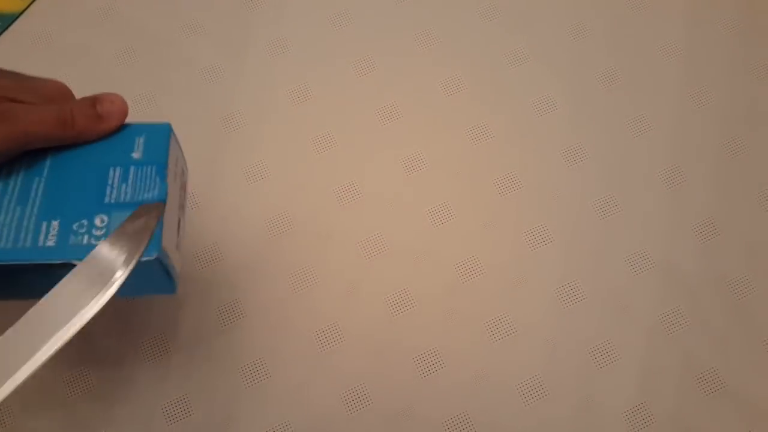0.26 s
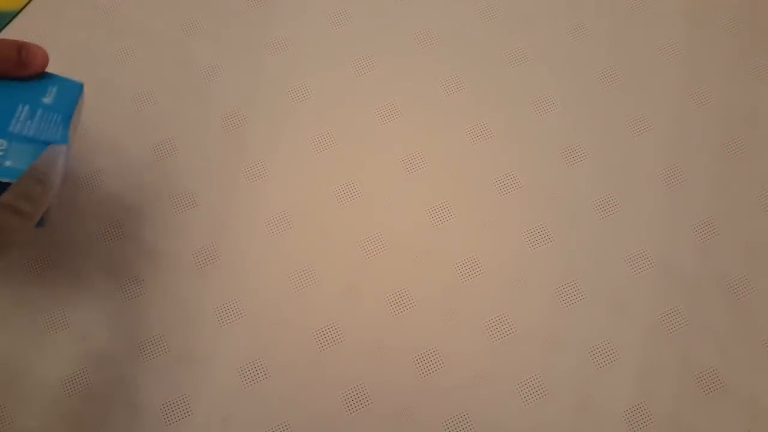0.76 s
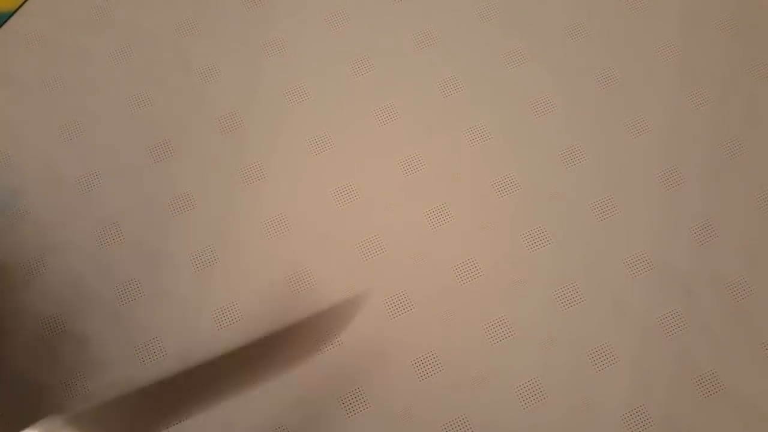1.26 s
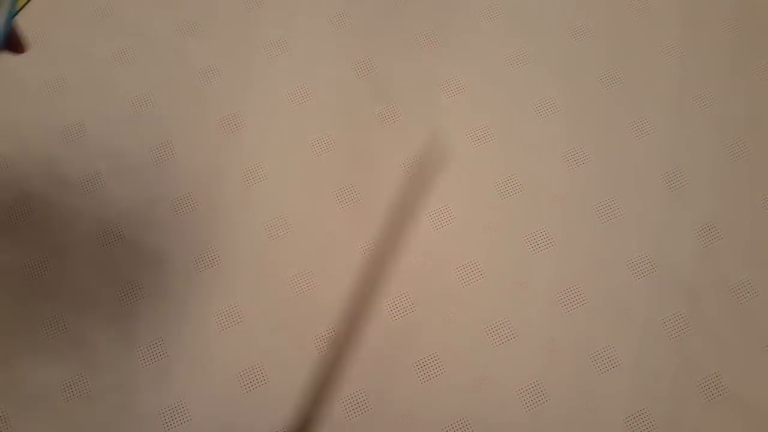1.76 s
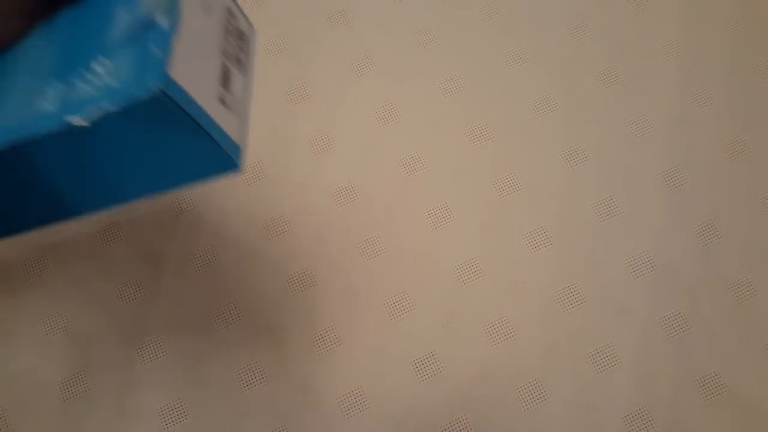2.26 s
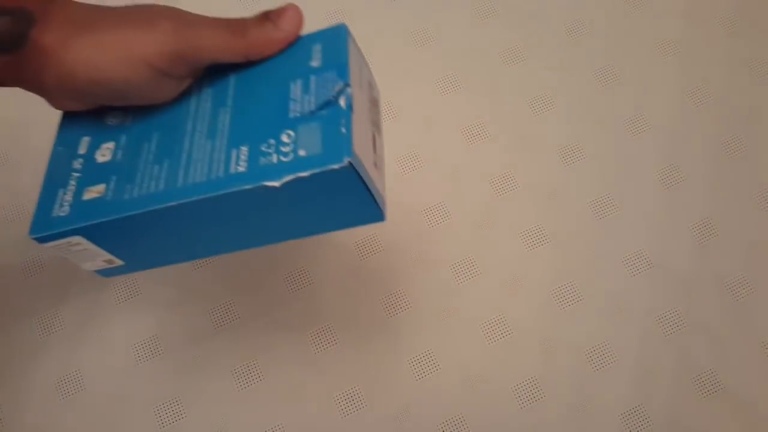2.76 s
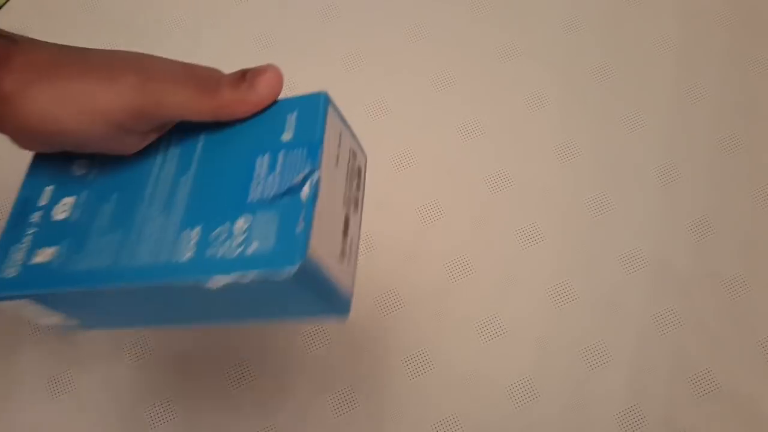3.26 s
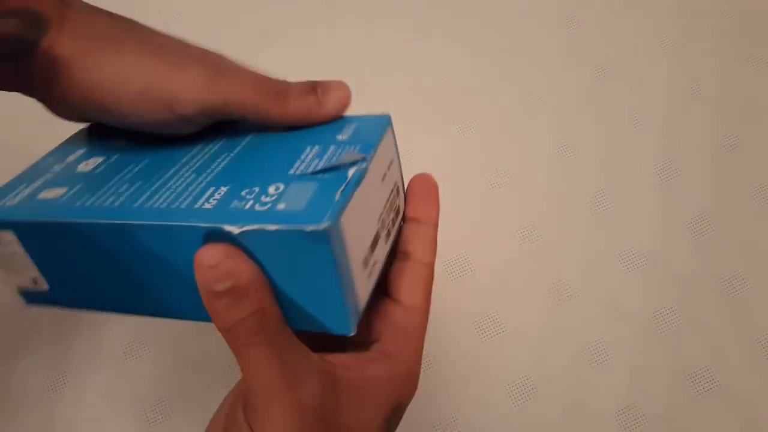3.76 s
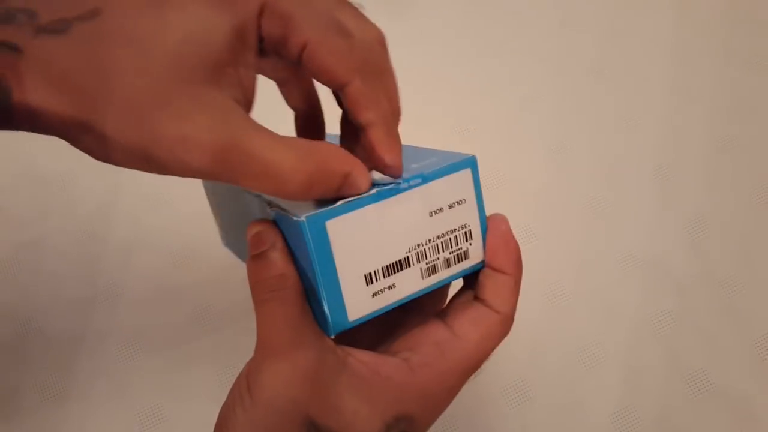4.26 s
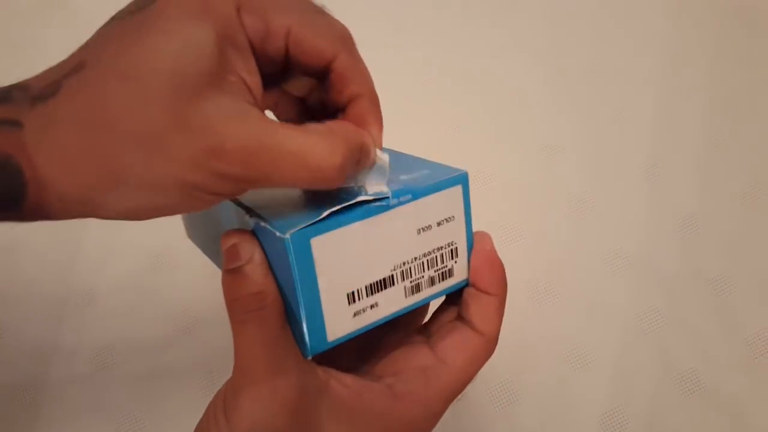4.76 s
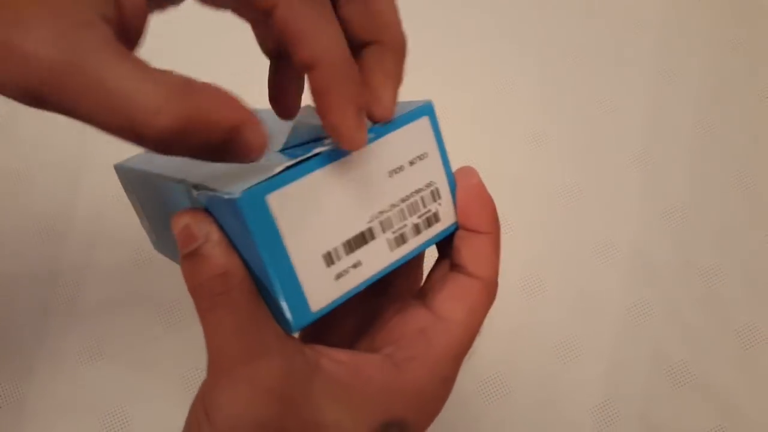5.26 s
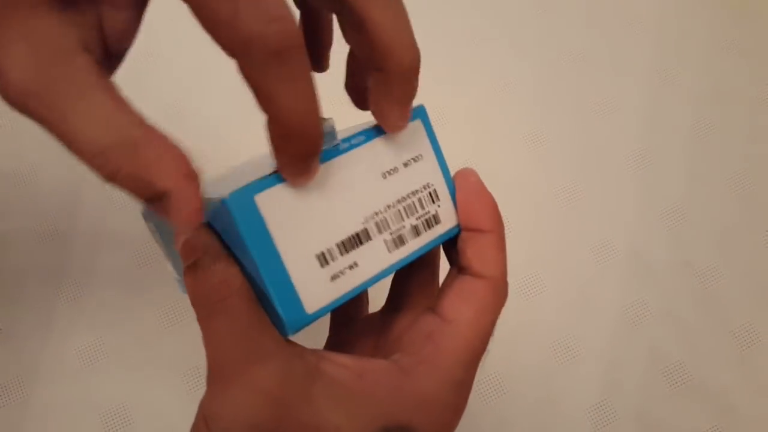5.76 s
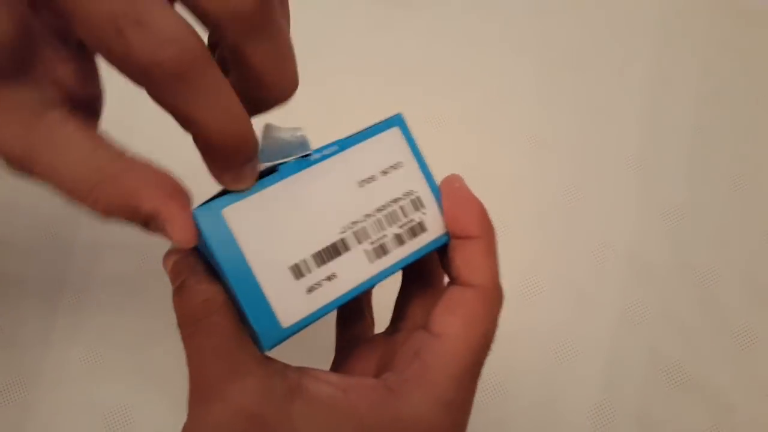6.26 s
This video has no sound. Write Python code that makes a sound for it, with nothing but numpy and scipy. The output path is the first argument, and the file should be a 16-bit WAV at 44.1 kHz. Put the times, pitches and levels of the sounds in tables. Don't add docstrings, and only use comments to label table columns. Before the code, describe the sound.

A blade ticks and scrapes on a small cardboard box, the seal pops loudly, the knife clunks onto a table, then fingers rub and peel snapping plastic film.

```python
import sys
import numpy as np
from scipy import signal
from scipy.io import wavfile
from scipy.ndimage import uniform_filter1d

SR = 44100
rng = np.random.default_rng(int(sys.argv[2]) if len(sys.argv) > 2 else 0)


def wav_record(signal):
    frames = np.transpose(np.atleast_2d(signal))
    bounded = np.clip(frames, -1, 1)
    quanta = np.round(bounded * 32767).astype(np.int16)
    wavfile.write(sys.argv[1], SR, quanta)


def linear_from_db(decibels):
    return 10 ** (np.asarray(decibels, float) / 20)


N = 286650


def evened(x):
    return x / np.sqrt(np.mean(x ** 2) + 1e-20)


def read(points, hz):
    f, value = np.transpose(points)
    return np.interp(np.log(hz + 1), np.log(f + 1), value)


def add(mix, s, sound):
    part = mix[:, round(s * SR):][:, :sound.shape[1]]
    part += sound[:, :part.shape[1]]


def filtered(x, order, hz, kind="low"):
    return signal.lfilter(*signal.butter(order, hz, kind, fs=SR), x)


def paired(size, same):
    a, b = rng.standard_normal((2, size))
    return np.array([a, same * a + np.sqrt(1 - same ** 2) * b])


def ring(x, modes, flip=-1):
    t = np.arange(3000) / SR
    body = np.zeros(3000)
    for k, (hz, width, db) in enumerate(modes):
        decay = np.sqrt(width) * np.exp(-np.pi * width * t)
        body += linear_from_db(db) * decay * np.sin(2 * np.pi * hz * t) * flip ** k
    return signal.oaconvolve(x, body[None] / np.linalg.norm(body), axes=1)[:, :N]


def burst(ms, same=0.63):
    t = np.arange(1500) / SR
    span = ms / 1000 + 1e-4
    uneven = linear_from_db(3 * rng.exponential(1, 1500))
    envelope = np.exp(-t / span) * (1 - np.exp(-t / (0.26 * span)))
    slips = paired(1500, same) * uneven * envelope
    return slips / np.sqrt(np.mean(np.sum(slips ** 2, 1)))


def push(ms):
    blow = signal.windows.hann(round(ms * SR / 1000) + 3)
    return np.array([blow, blow]) / np.linalg.norm(blow)


def pressure(rubs):
    t, out = np.arange(N) / SR, np.zeros(N)
    for s, rise, fall, db in rubs:
        span = slice(max(round((s - 2 * rise) * SR), 0), round((s + 2 * fall) * SR))
        away = abs(t[span] - s) / (np.where(t[span] < s, rise, fall) + 1e-4)
        out[span] += linear_from_db(db - 16 * away ** 1.2)
    return out


def contacts():
    # t/s, level/dB
    edge_ticks = [(0.0714, -44.5), (0.3936, -39.5), (0.5005, -39), (1.042, -42), (1.0848, -50),
                  (1.1003, -46.5), (1.1124, -48), (1.3567, -44), (1.8501, -58), (1.9918, -60),
                  (2.3135, -58), (2.9511, -56), (3.4475, -42.5), (3.7345, -35), (4.8059, -43),
                  (5.3866, -49.5)]
    # t/s, level/dB
    wall_taps = [(0.0262, -53), (0.0404, -57), (0.0602, -53), (0.2408, -55), (0.8025, -59.5), (0.824, -51),
                 (0.9027, -56), (0.9955, -54), (1.029, -52.5), (1.1552, -51), (3.1641, -54), (3.6136, -52),
                 (3.7544, -38.5), (3.761, -34), (4.08, -55), (4.148, -57.5), (4.8967, -53.5),
                 (5.3721, -62.5), (5.5785, -47), (5.618, -55), (6.1334, -60)]
    # t/s, level/dB
    film_ticks = [(0.2603, -66), (0.5244, -54), (0.7561, -58.5), (3.6605, -54), (3.6465, -65),
                  (3.7994, -55), (4.15, -57), (5.635, -63), (6.0684, -66), (3.9454, -62.5), (4.8214, -43.5),
                  (5.1514, -53.5), (5.7614, -60), (5.7886, -36.5), (5.868, -53.5), (5.8964, -62)]
    # t/s, panel level/dB, hollow level/dB, film level/dB, contact time/ms
    scuffs = [(3.5013, -54, -61, -64.5, 5.8), (3.5432, -54, -55.5, -61, 4.47),
              (3.8306, -53, -67.5, -55, 5.3), (5.2538, -40.5, -50.5, -39.5, 3.34),
              (5.5711, -56, -61, -53, 3.2), (5.706, -41, -55.5, -46.5, 3.79),
              (5.7828, -62.5, -65.5, -52.5, 3.13), (5.0776, -43, -41, -46, 2), (5.1006, -43, -50, -51, 1.4),
              (3.6475, -58, -55, -68, 1.5)]
    # (panel, hollow, film) level/dB
    on_edge, on_wall, on_film = (0, -13, -19), (0, -2, -13.5), (-10.5, -17, 0)
    events = list(scuffs)
    for rows, share in ((edge_ticks, on_edge), (wall_taps, on_wall), (film_ticks, on_film)):
        events += [(s, *np.add(db, share), 1.5) for s, db in rows]
    drive = np.zeros((3, 2, N))
    for s, panel_db, hollow_db, film_db, ms in events:
        contact = burst(ms, .95 if ms < .5 else .7) * max(ms / 1.582, 1)
        for part, db in zip(drive, (panel_db + 11.5, hollow_db + 17.0, film_db + 13)):
            add(part, s, linear_from_db(db) * contact)
    return drive


def rubbing():
    # peak t/s, rise/s, fall/s, peak level/dB
    card_rubs = [(.05, 0.26, 0.221, -61), (.312, .08, .06, -60.5), (.4, 0.0118, 0.033, -62.5),
                 (.518, 0.0925, .09, -64), (.74, 0.335, 0.098, -71.5), (.82, 0.038, 0.076, -64.5),
                 (.93, 0.096, 0.046, -61), (1.05, .07, 0.295, -64.5), (1.3, .05, .07, -58),
                 (1.378, .035, 0.06, -56), (4.825, .04, .045, -62), (4.728, .06, .035, -61),
                 (3.02, .012, .045, -67), (3.2, .06, .12, -67), (.13, .04, .07, -70),
                 (1.44, .03, .05, -66)]
    # peak t/s, rise/s, fall/s, peak level/dB
    skin_rubs = [(2.75, .14, 0.372, -69), (3.558, 0.151, 0.033, -63.5), (3.684, 0.084, 0.071, -58.5),
                 (3.745, 0.0235, 0.146, -54), (3.85, 0.094, 0.0325, -61), (3.92, 0.038, 0.179, -71),
                 (4.156, 0.094, 0.021, -68.5), (4.366, 0.27, 0.37, -72), (5.265, 0.0255, 0.04, -67),
                 (5.72, .005, 0.0327, -59), (6.122, 0.071, 0.021, -67.5)]
    # peak t/s, rise/s, fall/s, peak level/dB
    peel_rubs = [(1.375, 0.0432, .07, -62), (4.68, .05, .04, -61), (4.731, .045, .04, -47.5),
                 (4.81, .032, .05, -53), (4.84, .03, .035, -55), (5.081, .001, .022, -49),
                 (5.103, .002, .035, -57), (5.15, .04, .07, -68), (5.252, .045, .004, -60),
                 (5.38, .015, 0.021, -69), (5.786, 0.009, 0.011, -54), (5.87, 0.026, .1, -77.5)]
    # peak t/s, rise/s, fall/s, peak level/dB
    spine_rubs = [
        (3.091, 0.0041, 0.042, -42.5),
        (3.164, 0.0424, 0.187, -55.5),
    ]
    # (panel, hollow, film) level/dB
    by_card, by_skin, by_peel = (0, -2.5, -10), (-2.98, 0, -15), (-13, -18, 0)
    by_spine = (-13.5, 0, -33)
    loads = [pressure(rubs) for rubs in (card_rubs, skin_rubs, peel_rubs, spine_rubs)]
    load = linear_from_db(np.transpose([by_card, by_skin, by_peel, by_spine])) @ loads
    drive = np.zeros((3, 2, N))
    for k, (same, catch_db) in enumerate(((.7, 1.5), (.9, 1.2), (.7, 1.3))):
        clumps = linear_from_db(catch_db * evened(uniform_filter1d(rng.standard_normal(N), 200)))
        struck = rng.random(N) < 6000 / SR
        fibres = linear_from_db(3.0 * np.minimum(rng.exponential(1, N), 4)) * struck
        grain = evened(paired(N, same) * (fibres + 0.55) * clumps)
        drive[k] = grain * load[k] * linear_from_db(-2.0)
    return drive


def handling():
    # f/Hz, width/Hz, level/dB
    panel = [(1643, 390, -6), (2237, 310, -1.5), (2748.5, 380, -2.5), (3108, 410, -3.5), (4334, 1900, -8.5)]
    # f/Hz, width/Hz, level/dB
    hollow = [(335.2, 95, -1.5), (574.3, 160, -2), (802.6, 120, -2.5), (950, 180, -2.5), (1250, 300, -5.5)]
    # f/Hz, width/Hz, level/dB
    film = [(5227, 1200, -8), (7200, 800, -1.5), (9000, 1000, -1.5), (13250, 1300, -8), (14600, 2000, -11)]
    drive = contacts() + rubbing()
    direct = linear_from_db(-9) * filtered(drive[0], 1, [900, 6500], "band")
    return direct + sum(ring(part, modes) for part, modes in zip(drive, (panel, hollow, film)))


def pop():
    # t/s, push level/dB, push/ms, crack level/dB, crack/ms
    jerks = [
        (1.2257, -30, 0.43, -8.5, 0.64),
        (1.2268, -28, 0.129, -8.5, 1.07),
        (1.2287, -18, 0.905, -18, 1.94),
        (1.2355, -27.5, 0.56, -16, 4.5),
        (1.241, -30.5, 1, -18, 10.1),
    ]
    # f/Hz, width/Hz, level/dB
    popped_box = [(111, 54, -14.5), (160, 40, -13), (240, 28, -12.5), (327.1, 40, -10), (450.3, 83, -1),
                  (541, 72, -5), (692, 110, -8), (811, 60, -10), (1050, 150, -13.5), (1400, 390, -19),
                  (1950, 350, -7.5), (2248, 60, -6.5), (2690, 150, -4), (3100, 110, -2.5), (4600, 1800, -4)]
    blows, cracks = np.zeros((2, 2, N))
    for s, push_db, push_ms, crack_db, crack_ms in jerks:
        add(blows, s, linear_from_db(push_db + 12) * push(push_ms))
        add(cracks, s, linear_from_db(crack_db + 15.0) * burst(crack_ms, .6))
    thump = filtered(ring(blows, popped_box, flip=1), 2, 150, "high")
    rattle = ring(filtered(cracks, 1, 500, "high"), popped_box)
    body = filtered(cracks, 2, [650, 2300], "band")
    tear = filtered(cracks, 1, [2000, 13000], "band")
    return thump + 0.55 * rattle + body + tear


def knife():
    # t/s, thud level/dB, push/ms, edge tick level/dB
    landings = [
        (3.0069, -38.5, 0.6, -55),
        (3.014, -54, 1.02, -67),
        (3.029, -49.5, 1.25, -66),
        (3.072, -41, 1.24, -58.5),
        (3.0809, -26.5, 1.3, -31.5),
        (3.091, -31.5, 1.657, -65),
        (3.10, -35, 2.1, -64),
        (3.124, -47, 2.64, -64),
    ]
    # t/s, f/Hz, level/dB
    bending = [
        (3.12, 160.0, -46),
        (3.194, 162, -41.5),
        (3.212, 162.5, -58.5),
        (3.234, 161, -45),
        (3.248, 162, -88),
        (3.27, 163.9, -70.5),
    ]
    # f/Hz, width/Hz, level/dB
    table = [(53.37, 14.4, -6), (89, 101, -9.5), (160, 60.7, 5), (326.7, 117, 1.5), (448.8, 27.3, -4),
             (738, 41.4, -10), (880, 12.5, -7), (1169.5, 44, -3.5)]
    thuds, ticks = np.zeros((2, 2, N))
    for s, thud_db, ms, tick_db in landings:
        add(thuds, s, linear_from_db(thud_db + 10.5) * push(ms))
        add(ticks, s, linear_from_db(tick_db + 22.5) * burst(1.6))
    t = np.arange(N) / SR
    s, hz, db = np.transpose(bending)
    swing = uniform_filter1d(linear_from_db(np.interp(t, s, db, -150, -150)), 400)
    phase = 2 * np.pi * np.cumsum(np.interp(t, s, hz)) / SR
    quiver = np.sqrt(2) * swing * np.sin(phase)
    return ring(thuds, table) + filtered(ticks, 3, [700, 5600], "band") + quiver


def snaps():
    # t/s, film level/dB, left minus right/dB, jolt level/dB
    releases = [
        (5.0773, -15, 3, -40),
        (5.07834, -13, 9, -32),
        (5.07848, -3, 10, -40),
        (5.0997, -16, 5, -40),
        (5.10001, -6.5, 5, -40),
        (5.10012, -30, 8, -15),
    ]
    # f/Hz, width/Hz, level/dB
    taut_film = [(870, 400, -20), (2600, 900, -14), (3500, 900, -8), (4800, 1100, -8), (7150, 500, -1),
                 (8300, 1300, -2), (11000, 1800, -11), (13500, 2500, -14)]
    release, jolt = np.zeros((2, 2, N))
    left_only = np.array([[1.], [0.]])
    puff = signal.windows.hann(round(.2 * SR / 1000) + 2)
    for s, film_db, lean_db, jolt_db in releases:
        add(release, s, linear_from_db(film_db + np.array([[0], [-lean_db]])))
        add(jolt, s, -linear_from_db(jolt_db) * left_only * puff)
    return ring(release, taut_film) + filtered(jolt, 1, 130, "high")


def strokes(rows, taper=.4):
    out = np.zeros((2, N))
    for start, end, hz, width, db in rows:
        size = round((end - start) * SR)
        unsteady = linear_from_db(3.2 * evened(uniform_filter1d(rng.standard_normal(size), 150)))
        chatter = paired(size, 0.7) * unsteady
        skirt = signal.lfilter(*signal.iirpeak(hz, .3 * hz / width, SR), chatter)
        sung = signal.lfilter(*signal.iirpeak(hz, hz / width, SR), skirt)
        add(out, start, linear_from_db(db) * evened(sung) * signal.windows.tukey(size, taper))
    return out


def singing_strokes():
    # start t/s, end t/s, f/Hz, width/Hz, level/dB
    sung = [(0.068, 0.201, 3100, 400, -63.5), (0.26, 0.348, 2345, 300, -62), (0.267, 0.344, 1740, 140, -64),
            (.45, 0.6, 9000, 600, -76.5), (0.795, 0.858, 2620, 350, -61.5),
            (0.884, 0.947, 2700, 400, -62.5), (1.081, 1.167, 950, 151.5, -65.5),
            (3.004, 3.061, 482.2, 300, -52.5), (4.707, 4.757, 1700, 900, -62), (3.612, 3.7, 745, 80, -66),
            (3.614, 3.69, 950, 100, -68), (4.076, 4.12, 8763, 1775, -73), (4.35, 4.427, 8210, 1800, -75),
            (5.945, 5.991, 9000, 1520, -78), (6.093, 6.138, 950, 200, -68.5)]
    return strokes(sung)


def bumps():
    # t/s, level/dB, push/ms
    presses = [(0.819, -61, 3.06), (1.4, -58, 2.5), (3.546, -54, 2.84), (3.7613, -54, 1.37),
               (3.84, -57, 2.2), (4.156, -62.5, 1.43), (3.235, -54.5, 5.25), (4.888, -57, 3.5),
               (5.1, -64, 1.3), (5.257, -52.5, 1.09), (5.58, -67, 1.2)]
    # f/Hz, width/Hz, level/dB
    held_box = [(109.36, 36, -10), (191.1, 75, -1.5), (305.7, 140, -4)]
    drive = np.zeros((2, N))
    for s, db, ms in presses:
        add(drive, s, linear_from_db(db + 12.5) * push(ms))
    return ring(drive, held_box)


def flap():
    # t/s, level/dB
    flicks = [(4.4331, -53), (4.5031, -58), (5.9368, -60), (6.095, -49), (6.119, -57), (6.1942, -50),
              (6.2331, -53.5), (6.332, -50), (6.3668, -53), (6.4637, -49)]
    # f/Hz, width/Hz, level/dB
    flap_modes = [(1238, 270, -8), (2277, 258, -1), (3290, 640, -12)]
    drive = np.zeros((2, N))
    for s, db in flicks:
        add(drive, s, linear_from_db(db + 15.5) * burst(1.56))
    return ring(drive, flap_modes)


def tray():
    # t/s, level/dB
    knocks = [(3.6143, -61), (3.6215, -58), (3.63, -58), (3.6475, -55), (3.66, -58), (3.668, -58),
              (3.6725, -59), (3.6795, -52), (3.692, -60), (3.735, -48), (3.7615, -43), (3.766, -51),
              (3.772, -55), (3.833, -57)]
    # f/Hz, width/Hz, level/dB
    tray_modes = [(745, 90, -1), (950, 110, -2), (1120, 200, -6), (2000, 500, -8), (2750, 500, -5)]
    drive = np.zeros((2, N))
    for s, db in knocks:
        add(drive, s, linear_from_db(db + 16.5) * push(.12))
    return ring(drive, tray_modes)


def crackles():
    # t/s, f/Hz, peak level/dB
    pinpoints = [(.2135, 8000, -64), (.2665, 9300, -59), (.272, 9600, -62), (.2855, 9000, -59),
                 (.309, 9000, -61), (.3685, 7000, -60), (.3945, 2300, -47), (.3955, 7200, -58),
                 (1.0295, 6400, -59), (1.0425, 6000, -55), (1.0535, 6200, -63), (1.0855, 5600, -60),
                 (1.1015, 5400, -60), (1.1125, 6300, -60), (1.1235, 5400, -62), (1.1565, 5400, -59),
                 (3.507, 7500, -56), (3.6215, 6000, -60), (3.6465, 2300, -56), (3.6895, 8500, -60),
                 (3.6975, 9000, -59), (3.7215, 8200, -61), (3.735, 12500, -57), (3.85, 8500, -58),
                 (4.406, 9000, -65), (4.418, 8000, -66), (4.434, 9000, -62), (5.6785, 8200, -63),
                 (5.7065, 13300, -50), (5.7145, 12000, -58), (5.7925, 14000, -52), (4.6455, 9000, -56),
                 (4.6655, 2000, -60), (4.697, 7500, -52), (4.7085, 11000, -51), (4.75, 2500, -56),
                 (4.822, 12000, -55), (4.833, 2600, -54), (4.851, 4500, -57), (1.4355, 3000, -56),
                 (.0275, 3000, -54), (.039, 5000, -55), (.0692, 8000, -56), (.076, 9000, -61),
                 (.128, 9000, -62), (.137, 11000, -61), (.18, 11500, -63), (.5253, 12500, -56),
                 (.502, 2300, -49), (.6959, 6000, -64), (.7118, 7000, -61), (4.646, 12800, -55),
                 (4.807, 6200, -50), (5.0853, 8000, -38), (5.107, 12000, -50), (3.661, 9000, -54),
                 (3.757, 2700, -50), (3.7615, 9000, -48), (3.007, 1500, -48), (3.6215, 2800, -57)]
    out = np.zeros((2, N))
    for s, hz, db in pinpoints:
        rung = signal.lfilter(*signal.iirpeak(hz, 1.6, SR), burst(.6, .8))
        add(out, s, linear_from_db(db + 2.5) * rung / abs(rung).max())
    return out


def faint_slides():
    # start t/s, end t/s, f/Hz, width/Hz, level/dB
    slides = [(1.098, 1.14, 2350, 300, -66), (1.155, 1.172, 2350, 300, -66), (1.345, 1.43, 5600, 3000, -65),
              (1.335, 1.42, 11300, 5000, -64), (1.345, 1.42, 1280, 300, -65),
              (3.082, 3.118, 2200, 1200, -51), (3.138, 3.156, 950, 200, -55),
              (3.162, 3.182, 2300, 300, -60), (3.178, 3.205, 1350, 400, -64),
              (3.232, 3.252, 1000, 300, -65), (3.2, 3.29, 76, 30, -60), (1.35, 1.41, 2600, 900, -63),
              (1.25, 1.325, 12000, 6000, -60), (1.235, 1.31, 950, 500, -47), (3.9, 4.3, 330, 250, -70),
              (3.76, 3.79, 2200, 1200, -56), (5.08, 5.13, 4500, 2500, -60), (3.008, 3.05, 2200, 1200, -65),
              (1.43, 1.445, 900, 900, -60), (4.83, 4.865, 2700, 700, -62), (5.1, 5.165, 7000, 2200, -63),
              (3.1, 3.145, 420, 250, -48), (3.78, 3.87, 12500, 3500, -69), (4.645, 4.76, 12200, 2200, -61),
              (4.79, 4.868, 5200, 1500, -61), (5.712, 5.74, 3200, 900, -62), (.04, .2, 9200, 1200, -73),
              (.04, .19, 6500, 2500, -75), (.69, .72, 14000, 4000, -77), (.49, .54, 13000, 2500, -73),
              (5.42, 5.52, 350, 120, -70), (4.7, 4.77, 52, 25, -73), (4.87, 4.93, 52, 25, -70),
              (5.86, 5.93, 68, 25, -72), (1.26, 1.45, 500, 500, -60), (3.083, 3.108, 7500, 3000, -68),
              (4.7, 4.748, 7800, 1500, -56), (3.79, 3.81, 9000, 2500, -64), (1.34, 1.5, 180, 60, -66)]
    return strokes(slides, taper=.65)


def placed(x):
    # t/s, left delay/ms, left minus right/dB
    place = [(0.07, -0.154, 6), (0.45, -0.111, 3), (0.86, -0.185, 5), (1.05, -0.154, 2),
             (1.226, -0.255, 1.02), (1.37, -0.2875, 1.09), (3.05, -0.2117, 1.5), (3.5, -0.13, 3.5),
             (3.76, -0.1487, 4.5), (4.15, -0.037, 1.5), (4.434, 0.031, 6.5), (4.759, 0.003, 4),
             (5.08, -0.172, 8), (5.098, -0.1, 6), (5.255, -0.079, 3.5), (5.721, -0.126, 4.5),
             (6.201, 0.091, 4.5)]
    s, ms, db = np.transpose(place)
    n = np.arange(N)
    lag = np.round(np.interp(n / SR, s, ms) * SR / 1000).astype(int)
    lean = linear_from_db(np.interp(n / SR, s, db) / 2)
    bass = filtered(x, 1, 900)
    shaded = bass + (x - bass) * np.array([lean, 1 / lean])
    return np.array([shaded[0, np.clip(n - lag, 0, N - 1)], shaded[1]])


def room(x, tail_db=-12):
    # f/Hz, t60/s
    decay = [(100, 0.36), (350, 0.3), (800, 0.4), (2000, 0.27), (5000, 0.22), (12000, .17)]
    # delay/ms, level/dB
    echoes = [
        (2.1, -13.5),
        (4.2, -25),
        (7.3, -12.5),
        (12.5, -22),
    ]
    taps = np.zeros((2, SR // 2))
    at = np.arange(200, SR // 2 - 20, 20) + rng.integers(0, 20, (2, (SR // 2 - 201) // 20))
    np.put_along_axis(taps, at, rng.choice([-1., 1.], at.shape), 1)
    hz, t, z = signal.stft(taps, SR, nperseg=256)
    fading = linear_from_db(-60 * t / read(decay, hz)[:, None])
    tail = signal.istft(z * fading, SR, nperseg=256)[1]
    tail *= linear_from_db(tail_db) / np.linalg.norm(tail[0])
    for ms, db in echoes:
        tail[:, round(ms * SR / 1000)] += linear_from_db(db)
    return signal.fftconvolve(x, tail, axes=1)[:, :N]


def air():
    # f/Hz, level per Hz/dB
    spectrum = [(12, -8.5), (30, -15), (80, -4.5), (150, 0), (205, 1.5), (310, -6), (630, -11),
                (1300, -13.5), (2500, -15.5), (4000, -20), (6300, -25), (10800, -29.5), (12500, -25),
                (15500, -23.5)]
    # f/Hz, correlation
    likeness = [(60, 0.994), (200, 0.41), (600, 0.3), (1400, -.1), (3000, 0.08)]
    frames, hz = N // 512 + 5, np.fft.rfftfreq(2048, 1 / SR)
    a, b, c, d, patches = rng.standard_normal((frames, 1025, 5)).T
    patches = evened(uniform_filter1d(uniform_filter1d(patches, 30, 0), 8, 1))
    same = np.clip(read(likeness, hz), -1, 1)[:, None]
    left = a + 1j * b
    z = np.array([left, same * left + np.sqrt(1 - same ** 2) * (c + 1j * d)])
    z = z * linear_from_db(read(spectrum, hz)[:, None] + .8 * patches)
    hiss = signal.istft(z, nperseg=2048, noverlap=1536)[1][:, :N]
    waver = evened(uniform_filter1d(uniform_filter1d(rng.standard_normal((2, N)), 3000), 3000))
    phase = 2 * np.pi * np.cumsum(119.7 + 0.51 * waver[1]) / SR
    hum = linear_from_db(-67 + 0.46 * waver[0]) * np.sqrt(2) * np.sin(phase)
    opposite = linear_from_db(np.array([[.8], [-.8]]))
    return linear_from_db(-66.5) * evened(hiss) + hum * opposite


def scene():
    held = handling() + singing_strokes() + bumps() + flap() + tray()
    hands = placed(held) + snaps()
    loud = placed(pop() + knife())
    faint = placed(crackles() + faint_slides())
    return hands + loud + room(linear_from_db(-10) * hands + loud) + air() + faint


def roll_off(x):
    return signal.sosfilt(signal.butter(12, 16840, fs=SR, output="sos"), x)


def record(dry):
    edge = signal.firwin(255, 15900, window=("kaiser", 6), fs=SR)
    mix = signal.oaconvolve(dry, edge[None], "same") - .0004
    return roll_off(mix)


dry = scene()
out = record(dry)
wav_record(out)
```